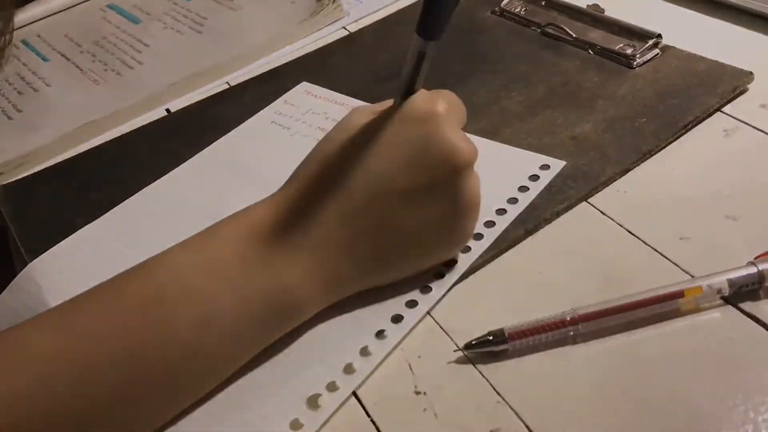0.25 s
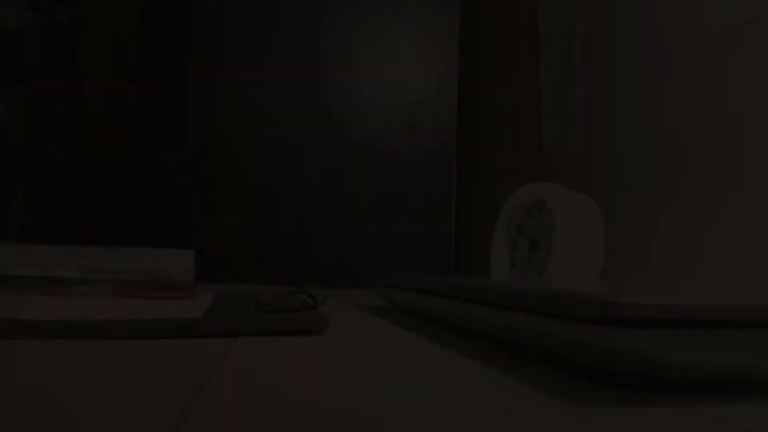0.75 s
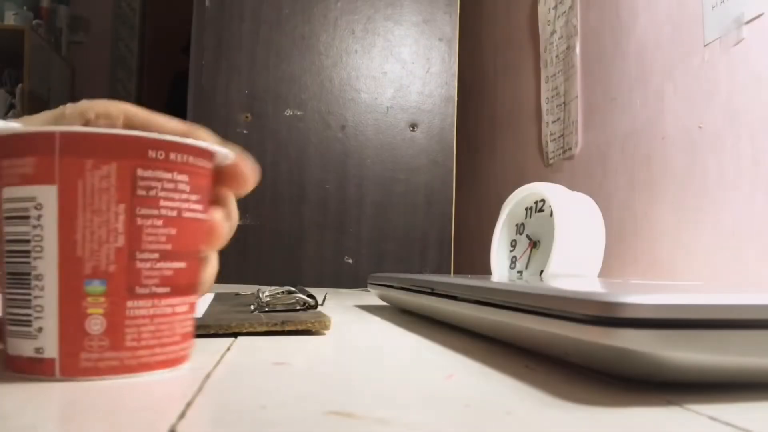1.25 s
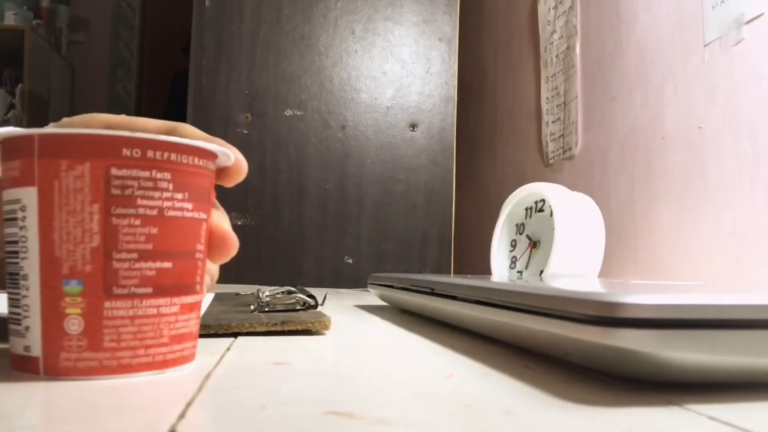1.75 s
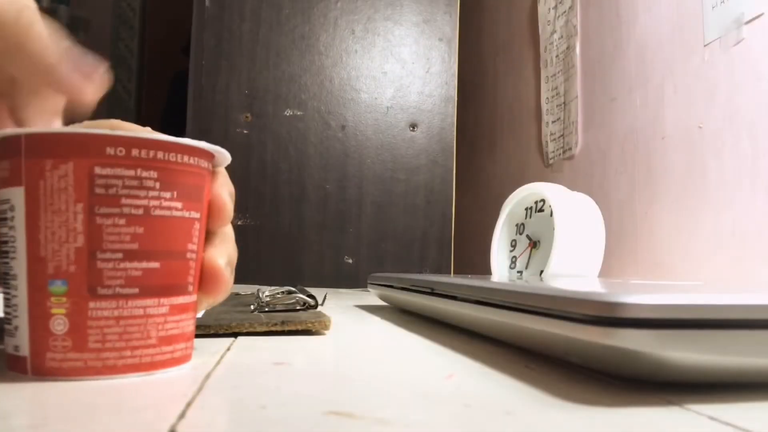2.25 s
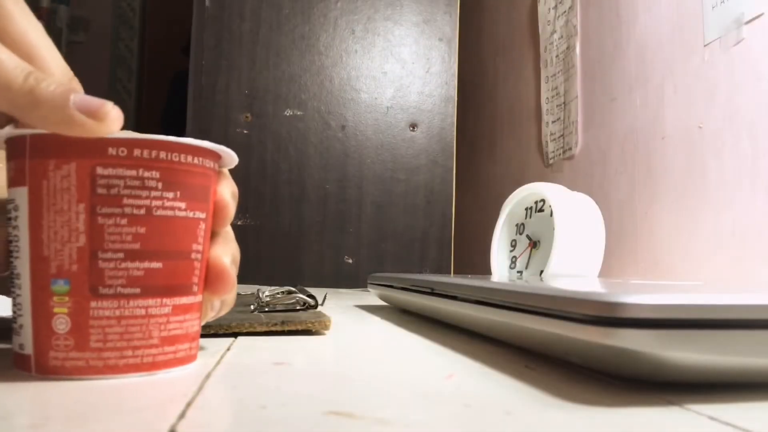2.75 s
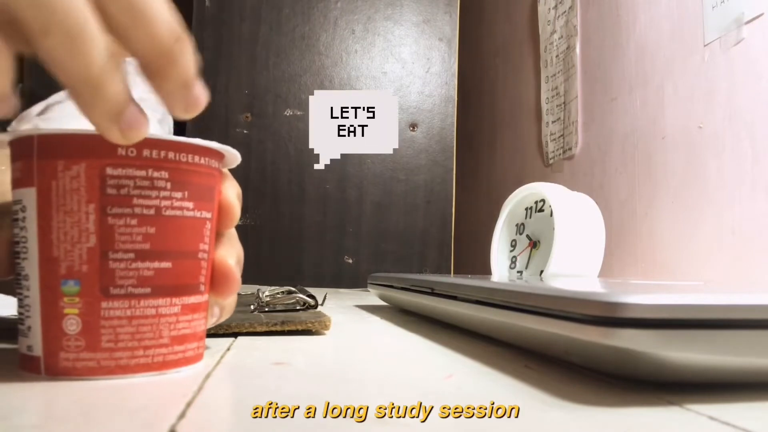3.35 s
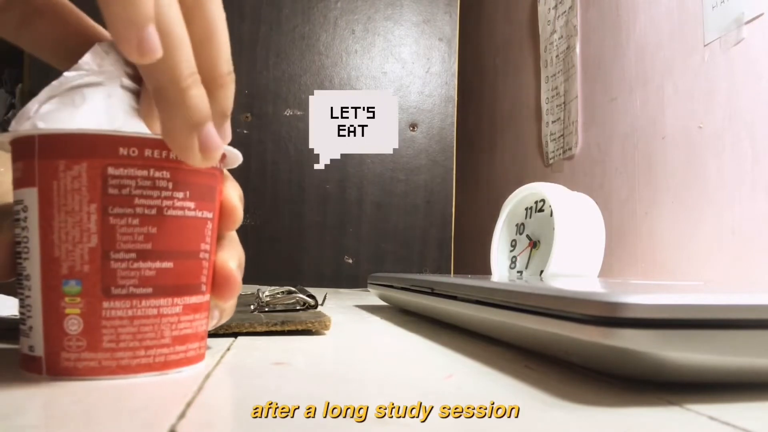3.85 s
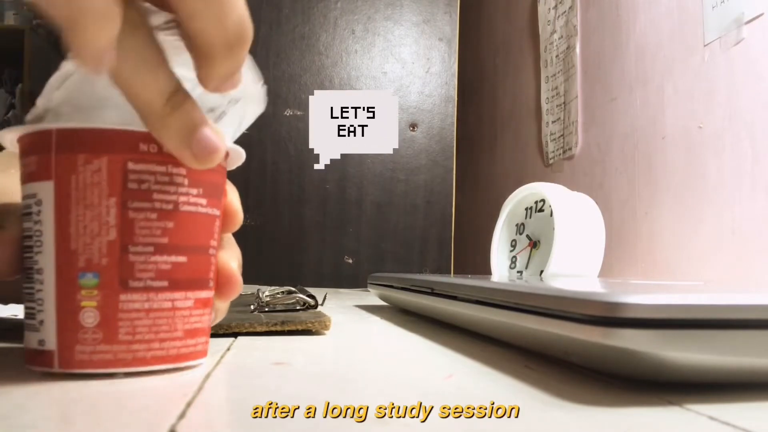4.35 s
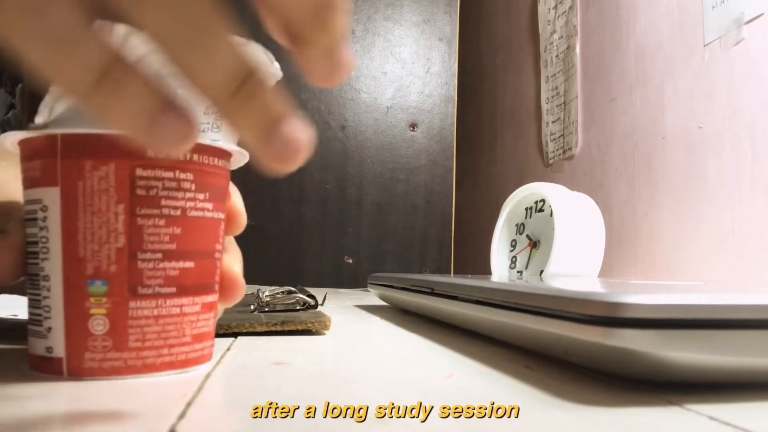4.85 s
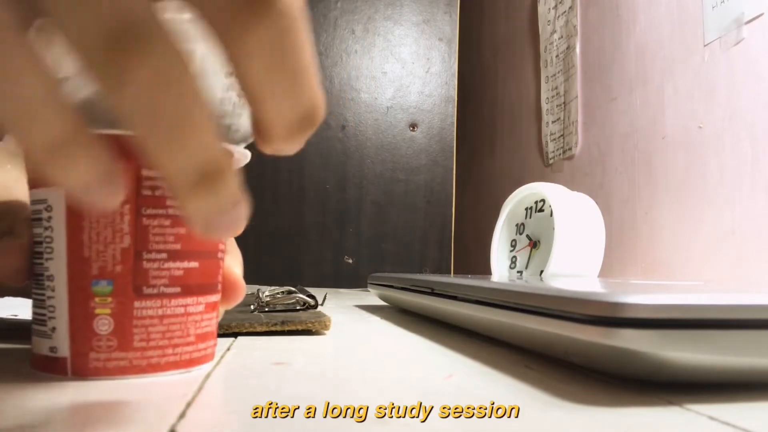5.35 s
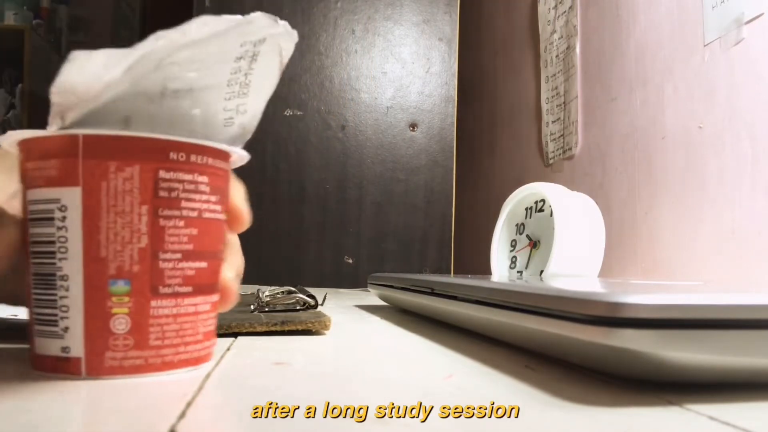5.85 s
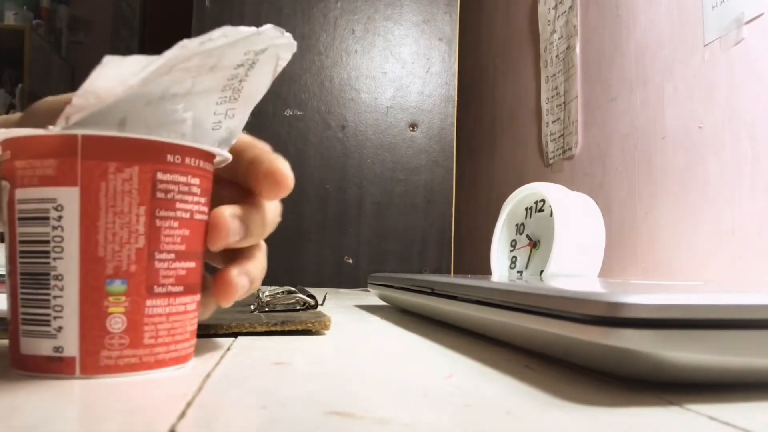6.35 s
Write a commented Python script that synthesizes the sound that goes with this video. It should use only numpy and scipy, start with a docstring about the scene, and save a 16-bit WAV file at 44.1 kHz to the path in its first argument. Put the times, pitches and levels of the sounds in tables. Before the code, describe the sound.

Close to the microphone in a small, quiet room, a plastic cup thumps onto a hard desk and settles. After a pause come thin foil ticks, small hollow cup pops and short crinkly pulls. One sharp snap opens the lid, with a ringing, crackling tear that dies away. Light finger brushes and gentle foil rustles follow, then a short juddering nudge with hollow taps. Faint hiss, low rumble and a thin whine remain behind.

```python
"""Opening a yogurt cup on a desk

A plastic yogurt cup is set down on a desk in a small quiet room, close to the microphone.
Fingers pick at the foil lid, the seal cracks open and tears along the rim, and the foil is folded back.
At last the cup is nudged along. Foil is random slips, sharp cracks and bending waves, sent through
resonances of lid and cup. Knocks, cup pops and taps, and desk booms are decaying sines, some with noise;
brushes and the nudge are friction. Faint air and a thin whine lie behind; short echoes surround the rest
except the desk booms.
"""
import sys
import numpy as np
from scipy import signal
from scipy.fft import rfft, irfft, next_fast_len
from scipy.io import wavfile
from scipy.ndimage import uniform_filter1d

SR = 44100
rng = np.random.default_rng(int(sys.argv[2]) if len(sys.argv) > 2 else 0)


def inscribe(sig):
    """Save sig as 16-bit PCM at rate SR to the path in sys.argv[1].

    A 1-D sig is mono; a 2-D sig holds one channel per row.
    Samples are clipped to [-1, 1] before scaling.
    """
    pcm = np.round(np.clip(np.atleast_2d(sig).T, -1, 1) * 32767)
    wavfile.write(sys.argv[1], SR, pcm.astype(np.int16))


N = 291615
T = np.arange(N) / SR
SHORT = T[:16384]  # time axis of one short sound, in seconds

# Room noise behind the scene. Each row: frequency in Hz, relative density in dB per Hz.
AIR_SPECTRUM = [(15, -45), (25, -27), (39, -14.5), (59, 2.5), (102, -10), (149, -7), (195, -13.5),
                (317, -14.5), (416, -20.5), (531, -18), (1130, -23), (1290, -22.5), (1610, -26.5),
                (14000, -32.5), (16000, -36.5)]
# Colour of the microphone port. Each row: frequency in Hz, gain in dB.
MIC_COLOUR = [(4200, -0.5), (4900, -4), (5700, 0), (7600, -4.5), (9200, -5), (10300, -8), (11300, -5),
              (14000, -3.5)]
# The desk top booms under cup and hands. Each row: start in seconds, level in dB, pitch in Hz.
DESK_BOOMS = [(1.077, -41, 109.2), (1.072, -44, 164.5), (1.226, -44.5, 111), (2.326, -54, 115),
              (2.759, -53, 103.4), (2.848, -54, 123), (4.086, -49, 108), (4.333, -47.5, 106.2),
              (5.105, -57.5, 113.5), (5.385, -58.5, 126), (5.6, -53, 125.5), (5.75, -55, 122),
              (5.932, -52.5, 126.5), (6.428, -55, 109)]
# Resonances of the sliding cup. Each row: frequency in Hz, width in Hz, gain in dB.
SLIDE_MODES = [(297, 260, -7.5), (760, 160, -6.5), (1120, 78, 1), (1410, 51, -4), (1740, 160, -8.5),
               (2810, 99, -17.5), (3280, 190, -26)]
# Fingertips and nails brush over foil and plastic.
# Each row: start in seconds, swell in seconds, level in dB, centre in Hz, width in octaves.
FINGER_BRUSHES = [(0.757, 0.014, -51.5, 12200, 1.4), (.775, 0.048, -63.5, 12000, 1.7),
                  (1.115, 0.025, -59, 6940, 0.44), (1.142, 0.029, -57.5, 1880, 1.2),
                  (1.275, 0.022, -59, 14000, 3.5), (2.131, 0.0085, -54.5, 3250, 2),
                  (2.153, 0.015, -54.5, 1970, 0.57), (3.144, 0.023, -61, 2010, 0.67),
                  (4.548, 0.0078, -52, 2580, 1.4), (4.63, 0.037, -58, 4000, 7.4),
                  (5.038, 0.025, -56, 3500, 0.85), (5.151, .11, -64, 3240, 0.25),
                  (5.439, 0.013, -47, 1850, 1), (5.744, 0.051, -56.5, 606, 1.15),
                  (5.829, 0.018, -54, 900, 0.73), (5.898, 0.02, -62.5, 5850, 1),
                  (6.061, 0.019, -63, 11100, 0.89), (6.15, 0.02, -58.5, 1880, 0.67),
                  (6.364, 0.022, -54, 5540, 0.38)]
# The cup's wall buckles under the fingers; the last three rows are taps of the cup as it is dragged
# on the desk. Each row: start in seconds, level in dB, pitch in Hz, t60 in seconds.
CUP_POPS_AND_TAPS = [(2.253, -53, 500, 0.022), (2.2543, -62, 1070, 0.015), (2.3362, -49, 336, 0.12),
                     (2.856, -55.5, 557, 0.0065), (3.034, -49.5, 915, 0.025), (3.056, -53, 1180, 0.01),
                     (3.2393, -43.5, 1243, 0.021), (4.1258, -41, 1450, 0.013), (4.1507, -40, 1910, 0.021),
                     (4.333, -53.5, 506, 0.011), (4.587, -58, 1570, 0.012), (4.5938, -52.5, 1310, 0.01),
                     (5.028, -62, 610, 0.015), (5.049, -52.5, 407, 0.004), (5.841, -52, 717, 0.052),
                     (6.3783, -47.5, 945, 0.08), (6.3892, -50, 1470, 0.022), (6.4022, -52, 1117, 0.085)]
# The cup's base meets the desk. Each row: start in seconds, level in dB, contact time in seconds.
BASE_KNOCKS = [(1.0722, -24, 0.00012), (1.093, -32, 0.00061), (1.11, -48, 0.0017), (1.183, -50, 0.0014),
               (1.2198, -49, 0.00041), (1.384, -63, 0.00025)]
# Modes of the cup on the desk. Each row: frequency in Hz, gain in dB, t60 in seconds.
KNOCK_MODES = [(111, -11, 0.14), (170.6, -7.5, 0.17), (319.5, -9, 0.058), (506, -2, 0.088),
               (585, -1, 0.076), (721, -6, 0.12), (856, -6.5, 0.08), (1065, 0, 0.019), (1180, -27, 0.2),
               (1316, -17, 0.063), (1480, -11, 0.067), (1563, -5, 0.049), (2000, 1, 0.009),
               (2580, -15, 0.011), (3170, -13.5, 0.028), (3875, -22.5, 0.068), (4460, -43, 0.036),
               (5930, -51, 0.052)]
# Foil creases and the seal snap.
# Each row: start in seconds, crack level in dB, crack pitch in Hz, level of the lid's ring in dB.
FOIL_SNAPS = [(2.284, -42.5, 16200, -61), (2.3103, -42, 15500, -62.5), (2.3345, -49, 14500, -74),
              (2.3491, -37.5, 14900, -48), (2.3784, -45.5, 14800, -55.5), (2.4177, -59, 12800, -78),
              (2.736, -54, 9600, -47.5), (2.8921, -43.5, 15000, -55), (2.9214, -41.5, 12200, -47.5),
              (2.9279, -43.5, 11000, -54), (2.9405, -53, 12900, -59), (2.9953, -68, 10900, -48),
              (3.0018, -53, 10900, -57), (3.0341, -49, 9600, -60), (4.0699, -29.5, 9900, -31),
              (4.0807, -33.5, 13100, -41.5), (4.122, -54, 12000, -46), (4.1259, -50, 5860, -47),
              (4.3075, -86, 5960, -66.5), (4.372, -65, 9600, -61), (5.182, -64, 13000, -61),
              (5.1917, -69, 9500, -55.5), (5.2697, -59, 11000, -59.5), (5.3066, -62, 3500, -58),
              (5.317, -55.5, 9650, -61), (5.3451, -52, 12100, -60)]
# Spectrum of a foil crack. Each row: frequency in Hz, gain in dB.
CRACK_SPECTRUM = [(300, -17), (1500, -41), (3300, -16), (5000, -9.5), (7400, -4), (9200, 0.5),
                  (12000, -0.5), (14500, -3.5), (17000, -4)]
# Spectrum of the lid's ring. Each row: frequency in Hz, gain in dB.
LID_SPECTRUM = [(100, -22), (250, -18), (400, -9), (900, -2.5), (1350, 0), (2000, -4), (3200, -3),
                (4200, -8), (6000, -14), (8000, -20), (16000, -32)]
# Resonances of the lid. Each row: frequency in Hz, width in Hz, gain in dB.
LID_MODES = [(527, 62, -26), (687, 52, 4.5), (1010, 57, 5.5), (1185, 24, 7.5), (1368, 73, 6.5),
             (1573, 130, 4.5), (2140, 400, -3.5), (2340, 16, 9), (2483, 98, -1.5), (3100, 89.5, -49),
             (3290, 220, -19), (4300, 210, -28)]
# Resonances of the cup's body. Each row: frequency in Hz, width in Hz, gain in dB.
BODY_MODES = [(108, 18, 2), (168.4, 29, 0.5), (239, 42, -10.5), (339.6, 59, -3.5), (534, 70, -8.5),
              (753, 96, -10)]
# Pulls or rubs of the fingers on the foil. Each row: start in seconds, hold in seconds,
# release t60 in seconds, rustle in dB, treble hiss in dB, body of the cup in dB.
FOIL_PULLS = [(1.931, 0.027, 0.95, -67, -76, -61), (2.26, .12, 0.066, -75.5, -80, -58.5),
              (2.725, 0.0098, .16, -44.5, -44, -39), (2.893, 0.073, 0.095, -54, -58, -48),
              (2.982, 0.043, 0.091, -49, -54.5, -46), (4.072, 0.019, 0.15, -37.5, -47, -42.5),
              (4.158, 0.039, 0.57, -45, -52.5, -52), (4.941, 0.042, 0.24, -68, -77, -62.5),
              (5.019, 0.042, 0.23, -55.5, -82, -53.5), (5.17, 0.13, .1, -60, -60.5, -63.5),
              (5.332, 0.032, 0.1, -57, -55.5, -54.5)]

AIR_DB = -62.5
WHINE_HZ, WHINE_WIDTH_HZ, WHINE_DB = 1275, 490, -74
BOOM_SWELL_CYCLES = 3.25
# the cup's base judders along the desk in one short push
NUDGE_S, NUDGE_ATTACK_S, NUDGE_HOLD_S, NUDGE_T60_S, NUDGE_DB = 6.371, 0.0058, 0.012, 0.16, -40
OPEN_S = 4.06  # the seal gives way and the lid is free to ring
# a long pull starts gently: its attack grows by this share of the hold
PULL_ATTACK_S, PULL_ATTACK_SHARE = 0.0029, .15
BODY_POWER = 0.56  # the cup's body dies away later than the pull
START_S, TOP_HZ = .629, 15950  # the microphone opens; upper edge of its band


def undb(db):
    """Decibels to gain."""
    return 10 ** (np.asarray(db) / 20)


def unit(x):
    """Scale to rms 1."""
    return x / np.sqrt(np.mean(x ** 2))


def blow(x):
    """Scale a short sound to the energy of 20 ms at rms 1."""
    return x / np.sqrt(np.sum(x ** 2) / (.02 * SR))


def add(out, start, x):
    """Mix x into out from a time in seconds on."""
    i = int(start * SR)
    out[i:i + len(x)] += x[:N - i]


def filtered(x, response):
    """Pass x through a frequency response, given as a function of Hz."""
    size = next_fast_len(len(x) + 4096)
    hz = np.maximum(np.arange(size // 2 + 1) * SR / size, 1)
    return irfft(rfft(x, size) * response(hz), size)[:len(x)]


def colour(x, points):
    """Give x a spectrum of (Hz, dB) points."""
    hz, db = np.transpose(points)
    return filtered(x, lambda f: undb(np.interp(np.log(f), np.log(hz), db)))


def resonate(x, modes):
    """Pass x through parallel (Hz, width, dB) resonances of alternating sign."""
    def response(f):
        total = 0
        for k, (hz, width, db) in enumerate(modes):
            detuning = (f / hz - hz / f) * hz / width
            total = total + (-1) ** k * undb(db) / (1 + 1j * detuning)
        return total
    return filtered(x, response)


def fade(t60):
    """Exponential decay by 60 dB in t60 seconds."""
    return np.exp(-np.log(1000) * SHORT / t60)


def burst(t60):
    """Noise that dies away."""
    return blow(rng.standard_normal(len(SHORT)) * fade(t60))


def grains(rate, spread_db, size):
    """Tiny slips at random moments and of uneven strength; the power does not depend on their rate."""
    strength = undb(spread_db * np.minimum(rng.exponential(size=size), 4))
    slipping = rng.random(size) < rate / SR
    sign = rng.choice([-1, 1], size)
    return unit(slipping * sign * strength / np.sqrt(rate))


def wander(size):
    """Smooth chance of spread 1 that changes over size samples."""
    return unit(uniform_filter1d(rng.standard_normal(N), size))


def gesture(start, attack, hold, t60):
    """Effort of a hand: it rises, holds and dies away."""
    age = T - start
    release = np.clip((age - attack - hold) / t60, 0, 2)
    return np.clip(age / attack, 0, 1) * np.exp(-np.log(1000) * release)


def waver(x, depth):
    """Let the pitch of a ring drift by a share depth as its sheet bends."""
    bend = uniform_filter1d(wander(size=2000), size=2000)
    bend_speed = np.std(np.diff(bend) * SR)
    return np.interp(T + depth * bend / bend_speed, T, x)


def air(band_db=-1):
    """Faint rumble and hiss, with a thin whine of slightly drifting pitch in a band of noise."""
    pitch = WHINE_HZ + 6 * wander(size=1500)
    tone = unit(np.sin(2 * np.pi * np.cumsum(pitch) / SR))
    band = unit(resonate(rng.standard_normal(N), [(WHINE_HZ, WHINE_WIDTH_HZ, 0)]))
    hush = unit(colour(rng.standard_normal(N), AIR_SPECTRUM))
    return undb(AIR_DB) * hush + undb(WHINE_DB) * (tone + undb(band_db) * band)


def room(x, near_db=-9.5, near_t60=0.039, far_db=-16.5, far_t60=0.4):
    """Quick reflections from things on the desk, then the walls' short tail; the bass stays drier."""
    near_noise = burst(near_t60) * (SHORT > .0015)
    near = blow(colour(near_noise, [(250, -14), (1200, 0), (7000, 0), (16000, -3)]))
    far_noise = burst(far_t60) * (SHORT > .006)
    far = blow(colour(far_noise, [(170, -9), (1000, 0), (5000, 0), (16000, -3)]))
    echoes = (undb(near_db) * near + undb(far_db) * far) / np.linalg.norm(near)
    return x + signal.fftconvolve(x, echoes)[:N]


def booms():
    """A soft push lets a low mode of the desk swell for a few cycles and die."""
    out = np.zeros(N)
    for start, db, hz in DESK_BOOMS:
        age = SHORT * hz / BOOM_SWELL_CYCLES
        swell = (age * np.exp(1 - age)) ** 2
        add(out, start, undb(db) * np.sqrt(2) * np.sin(2 * np.pi * hz * SHORT) * swell)
    return out


def nudge(rate=2500, spread_db=2):
    """The base sticks and slips, ringing the cup."""
    push = gesture(NUDGE_S, NUDGE_ATTACK_S, NUDGE_HOLD_S, NUDGE_T60_S)
    judder = unit(resonate(grains(rate, spread_db, size=N), SLIDE_MODES))
    return undb(NUDGE_DB) * push * judder


def brushes(rate=4000, spread_db=3, sharpness=5):
    """Short strokes of fine friction that swell and fade."""
    out = np.zeros(N)
    for start, swell, db, hz, octaves in FINGER_BRUSHES:
        friction = grains(rate, spread_db, size=len(SHORT))
        rub = filtered(friction, lambda f: np.exp(-.5 * (np.log2(f / hz) / octaves) ** 2))
        age = SHORT / swell
        stroke = (age * np.exp(1 - age)) ** sharpness
        add(out, start, undb(db) * unit(rub) * stroke)
    return out


def pops_and_taps(overtone_db=-17, undertone_db=-9, rattle_db=-7, rattle_width=0.12, onset_s=0.00033):
    """The thin wall flips, or the dragged cup taps the desk: a brief ring and a rattle around its pitch."""
    out = np.zeros(N)
    partials = [(1, 0), (1.85, overtone_db), (.62, undertone_db)]  # pitch ratio, dB
    for start, db, hz, t60 in CUP_POPS_AND_TAPS:
        tones = sum(undb(gain_db) * np.sin(2 * np.pi * ratio * hz * SHORT) for ratio, gain_db in partials)
        ring = blow(tones * fade(t60))
        rattle = blow(resonate(burst(t60), [(hz, rattle_width * hz, 0)]))
        onset = 1 - np.exp(-SHORT / onset_s)
        add(out, start, undb(db) * blow((ring + undb(rattle_db) * rattle) * onset))
    return out


def knocks(crack_db=-9, crack_t60=0.027, clatter_db=-22, clatter_t60=0.15):
    """The full cup lands and rocks; a softer contact lasts longer and sounds duller."""
    out = np.zeros(N)
    ring = 0
    for k, (hz, db, t60) in enumerate(KNOCK_MODES):
        ring = ring + (-1) ** k * undb(db) * np.sin(2 * np.pi * hz * SHORT) * fade(t60)
    ring = blow(ring)
    for start, db, contact in BASE_KNOCKS:
        crack = blow(resonate(burst(crack_t60), [(706, 1470, -8.0), (1670, 1120, -8.5)]))
        # the rim of the base chatters on the desk as it settles
        chatter = grains(980, 6.6, size=len(SHORT)) * fade(clatter_t60)
        clatter = blow(resonate(chatter, [(3100, 2700, 0)]))
        # smooth push of the contact, peaking after one contact time
        push = np.exp(-.5 * (SHORT[:256] * np.pi / contact - np.pi) ** 2)
        impact = ring + undb(crack_db) * crack + undb(clatter_db) * clatter
        add(out, start, undb(db) * blow(signal.fftconvolve(impact, push)))
    return out


def snaps(travel_s=0.001015, scatter_db=-5, scatter_t60=0.0094, shiver_db=-8, shiver_t60=0.065,
          sealed_db=-11, free_db=-2, width=0.14, broad_db=-3):
    """Each snap runs through the foil as a bending wave, treble first, and leaves the lid shivering."""
    out = np.zeros(N)
    lead = 128  # samples of silence ahead of the snap for the filters
    # travel_s is the delay at 1 kHz; it falls with the root of frequency
    wave = filtered(signal.unit_impulse(len(SHORT)),
                    lambda f: np.exp(-4j * np.pi * travel_s * np.sqrt(1000 * f)))
    for start, crack_db, hz, lid_db in FOIL_SNAPS:
        # wrinkles and the rim scatter the wave
        scattered = undb(scatter_db) * burst(scatter_t60) + undb(shiver_db) * burst(shiver_t60)
        kick = np.pad(blow(wave) + scattered, (lead, 0))
        # a smaller crease cracks higher
        pitched = blow(resonate(kick, [(hz, width * hz, 0)]))
        crack = pitched + undb(broad_db) * blow(colour(kick, CRACK_SPECTRUM))
        ringing_db = free_db if start > OPEN_S else sealed_db
        lid_ring = blow(resonate(kick, LID_MODES))
        lid = blow(colour(kick, LID_SPECTRUM)) + undb(ringing_db) * lid_ring
        add(out, start - lead / SR, undb(crack_db) * blow(crack) + undb(lid_db) * blow(lid))
    return out


def crinkle(slips, points, patchy_db):
    """Each crease favours its own pitch: the octaves of the crackle flicker separately."""
    base, out = colour(slips, points), 0
    for hz in 125 * 2 ** np.arange(8):
        band = filtered(base, lambda f: np.maximum(1 - np.abs(np.log2(f / hz)), 0))
        out = out + band * undb(patchy_db * wander(size=450))
    return unit(out)


def peel(rate=2000, rate_at_db=-55, rate_rise=0.39, spread_db=2.5, catch_db=2, patchy_db=3,
         sealed_db=-9, free_db=6, flex=0.012, squeeze=0.048,
         crease_rate=70, crease_db=-8, crease_spread_db=2):
    """Glue threads part and creases slip in a dense crackle that drives the lid and the cup."""
    power = np.zeros((3, N))
    for start, hold, t60, rustle_db, hiss_db, body_db in FOIL_PULLS:
        effort = gesture(start, PULL_ATTACK_S + PULL_ATTACK_SHARE * hold, hold, t60)
        levels = [undb(rustle_db) * effort, undb(hiss_db) * effort, undb(body_db) * effort ** BODY_POWER]
        power += np.array(levels) ** 2
    rustle, hiss, body = np.sqrt(power)
    # a faster pull is louder and parts more threads a second
    slip_rate = 1000 + rate * (rustle / undb(rate_at_db)) ** rate_rise
    # the foil catches and lets go every few milliseconds
    slips = unit(grains(slip_rate, spread_db, size=N) * undb(catch_db * wander(size=220)))
    # now and then a small crease flips
    slips = slips + undb(crease_db) * grains(crease_rate, crease_spread_db, size=N)
    # the lid bends and the cup is squeezed, so their resonances waver
    ring = unit(waver(resonate(slips, LID_MODES), flex))
    cup = unit(waver(resonate(slips, BODY_MODES), squeeze))
    ringing = undb(np.where(T > OPEN_S, free_db, sealed_db))
    lid = (crinkle(slips, LID_SPECTRUM, patchy_db) + ringing * ring) / np.hypot(1, ringing)
    treble = crinkle(slips, CRACK_SPECTRUM, patchy_db)
    return rustle * lid + hiss * treble + body * cup


def scene():
    """Cup, foil and hands in the room, over the desk's booms and the air."""
    close_sounds = nudge() + brushes() + pops_and_taps() + knocks() + snaps() + peel()
    return (air() + booms() + room(close_sounds))[None]


def record(dry):
    """The microphone colours the treble and opens after a silent start; the top is cut."""
    opened = np.clip((T - START_S) / .005, 0, 1)
    top_cut = signal.ellip(10, .2, 80, TOP_HZ, fs=SR, output="sos")
    return signal.sosfilt(top_cut, colour(dry[0], MIC_COLOUR) * opened)[None]


dry = scene()
out = record(dry)
inscribe(out)
```